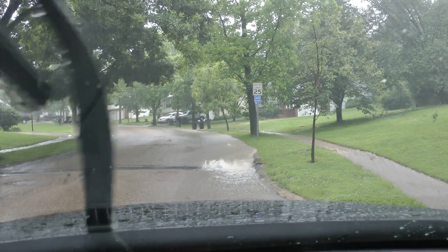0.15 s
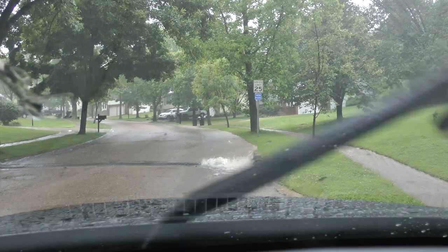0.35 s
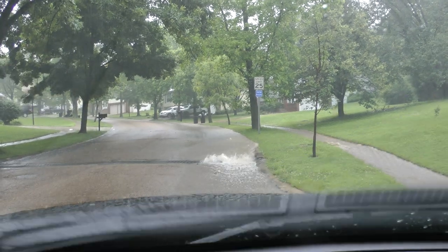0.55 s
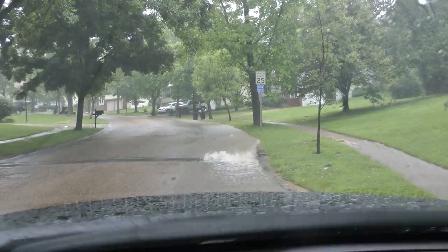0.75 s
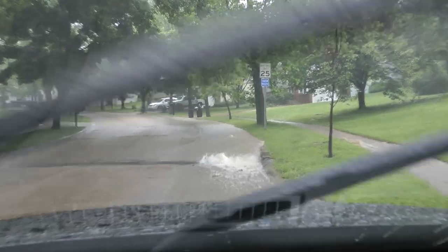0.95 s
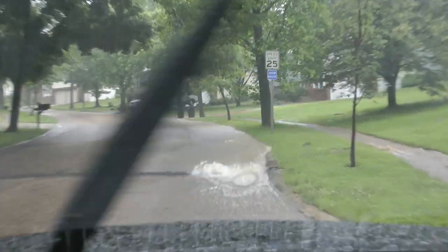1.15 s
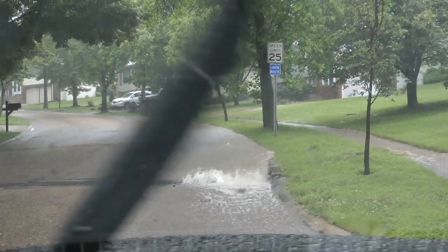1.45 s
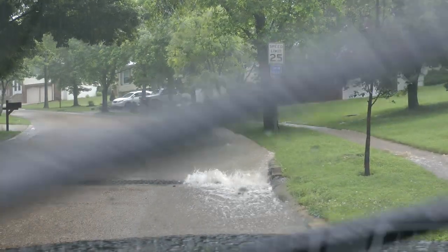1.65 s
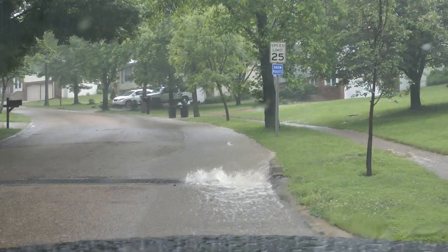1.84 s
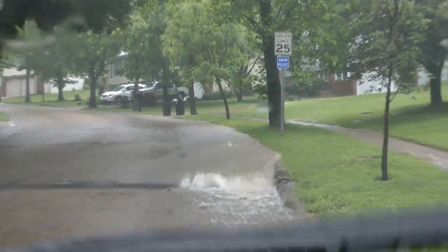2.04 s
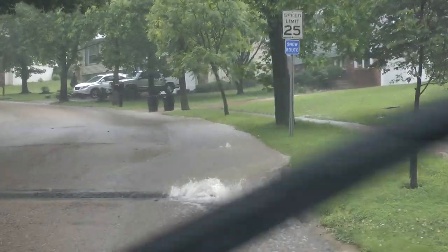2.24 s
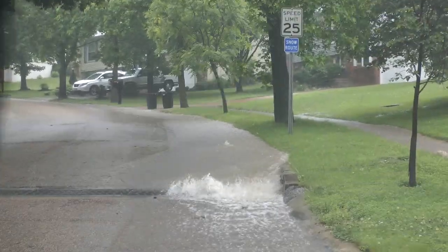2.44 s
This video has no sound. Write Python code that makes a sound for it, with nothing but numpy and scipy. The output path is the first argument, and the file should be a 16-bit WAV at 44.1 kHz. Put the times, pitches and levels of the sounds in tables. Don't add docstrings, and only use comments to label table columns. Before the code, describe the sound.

Rain drums densely on a parked car, heard inside through a small close stereo microphone. Sound opens abruptly at about 0.05 s. Patter and hiss continue to the end, with irregular glass ticks and heavy roof splats, strong near 0.85, 1.84, 2.05 and 2.3 s. Low wiper shudders swell around 0.24, 0.84, 1.44, 2.05 and 2.64 s. Brief lulls come near 1.06 and 1.8-2.1 s; the engine idles faintly.

```python
import sys
import numpy as np
from scipy import signal
from scipy.fft import rfft, irfft, next_fast_len
from scipy.io import wavfile

SR = 44100
rng = np.random.default_rng(int(sys.argv[2]) if len(sys.argv) > 2 else 0)


def digitize_waveform(pressure):
    field = np.atleast_2d(pressure).T
    bounded = np.clip(field, -1, 1)
    quanta = np.round(bounded * 32767).astype(np.int16)
    wavfile.write(sys.argv[1], SR, quanta)


def undo_db(level):
    steps = np.asarray(level, float) / 20
    return 10 ** steps


N = 114219

# start_s, level_db
TOP_TURNS = [
    (.235, -27),
    (1.444, -29.5),
    (2.64, -27.5),
]
# start_s, level_db
LOW_TURNS = [
    (.84, -32),
    (2.046, -32),
]


def read(points, hz):
    f, value = np.transpose(points)
    return np.interp(np.log(hz + 1), np.log(f + 1), value)


def evened(x):
    return x / np.sqrt(np.mean(x ** 2) + 1e-20)


def add(mix, start_s, sound):
    part = mix[..., max(round(start_s * SR), 0):][..., :sound.shape[-1]]
    part += sound[..., :part.shape[-1]]


def causal(db):
    log = np.log(undo_db(np.maximum(np.r_[db, db[-2:0:-1]], -100)))
    return np.fft.ifft(np.exp(log - 1j * signal.hilbert(log).imag)).real[:4096]


def coloured(x, points, below_db_per_oct, above_db_per_oct):
    # centre_hz, width_hz, gain_db
    cabin = [(497, 44, -8.5), (580.3, 27, 4), (633, 35, -6), (737, 290, -2.5), (916, 150, -10.5),
             (1044, 17, 3), (1149, 31, -13), (1282, 115, -6), (1450, 160, 2.5), (1551, 60, -16),
             (185, 125, 4), (3110, 280, -0.5)]
    hz = np.fft.rfftfreq(8192, 1 / SR)
    octs = np.log2(hz + 1)
    db = read(points[1:-1], hz)
    db = db - below_db_per_oct * np.maximum(np.log2(points[1][0]) - octs, 0)
    db = db - above_db_per_oct * np.maximum(octs - np.log2(points[-2][0]), 0)
    db = db + sum(gain_db / (1 + (2 * (hz - f) / width_hz) ** 2) for f, width_hz, gain_db in cabin)
    taps = causal(db)
    return signal.oaconvolve(x, taps[None] / np.linalg.norm(taps), axes=1)[:, :N]


def rain_gain(share):
    # centre_s, level_db
    lulls = [
        (.335, -0.5),
        (1.064, -6),
        (1.21, -1),
        (1.34, -0.5),
        (1.688, -0.5),
        (1.811, -7.5),
        (1.965, -6),
        (2.11, -4.5),
        (2.415, -0.5),
    ]
    lull_s = 0.016
    t = np.arange(N) / SR
    dip_db = sum(db * np.exp(-((t - s) / lull_s) ** 2) for s, db in lulls)
    return undo_db(share * dip_db)


def splat(noise, t60_s, tick_db, rise_s):
    t = np.arange(noise.shape[-1]) / SR
    ring = noise * undo_db(-60 * t / t60_s) * (1 - np.exp(-t / rise_s))
    return ring + undo_db(tick_db) * (t == 0) * [[1], [0]]


def patter(per_s, spread_db, tick_db, short_s, long_s, tint_db):
    size = undo_db(spread_db * np.minimum(rng.exponential(1, N), 4)) * (rng.random(N) < per_s / SR)
    kind = rng.integers(0, 16, N)
    t60s = np.geomspace(short_s, long_s, num=16)
    bands_hz = rng.permutation(np.geomspace(2000., 13000., num=16))
    out = np.zeros((2, N))
    for k, (t60_s, band_hz) in enumerate(zip(t60s, bands_hz)):
        grain = splat(rng.standard_normal((2, 3000)), t60_s, tick_db, 0.00024)
        grain = grain + undo_db(tint_db) * signal.lfilter(*signal.iirpeak(band_hz, 1.5, SR), grain)
        grain = grain / np.linalg.norm(grain[0])
        out += signal.oaconvolve((size * (kind == k))[None], grain, axes=1)[:, :N]
    return evened(out)


def engine():
    idle_hz = 32.3
    return undo_db(-56.5) * np.sin(2 * np.pi * idle_hz * np.arange(N) / SR) * [[1], [.3]]


def big_drops():
    # start_s, level_db, ring_hz, t60_s, drumming_db
    heavy_drops = [(0.0673, -25.5, 2600, 0.054, -11.5), (0.116, -28.5, 2940, 0.12, -11),
                   (0.158, -21.5, 2600, 0.1, -24), (0.2007, -27.5, 2940, 0.34, -28),
                   (0.2433, -21.5, 2560, 0.075, -2.5), (0.2949, -19.5, 2800, 0.095, -10.5),
                   (0.3516, -21.5, 1900, 0.065, -4), (0.4139, -20, 3270, 0.042, -9.5),
                   (0.5856, -30.5, 1930, 0.2, -3), (0.645, -23, 4000, 0.053, -36),
                   (0.7011, -30, 4000, 0.28, 1), (0.7735, -18, 3240, 0.064, -8),
                   (0.806, -20, 2230, 0.03, -10), (0.8478, -12.5, 3110, 0.047, -9.5),
                   (1.0862, -27, 3120, 0.066, -11), (1.1351, -27.5, 2240, 0.12, -14),
                   (1.2368, -22.5, 2100, 0.1, -5.5), (0.273, -17.5, 3006, 0.035, -9.5),
                   (0.4625, -28, 2820, 0.02, -2), (0.915, -37, 2600, 0.08, -16),
                   (1.02, -27.5, 3330, 0.04, -4.5), (1.098, -28.5, 2980, 0.22, -8),
                   (1.185, -24.5, 2340, 0.08, -8),
                   (1.2888, -27, 3740, 0.14, -18), (1.526, -19, 3110, 0.044, -9),
                  (1.5814, -21, 2150, 0.094, -3.5), (1.6439, -20, 3920, 0.025, -14),
                  (1.714, -19, 2780, 0.22, -8.5), (1.8496, -21.5, 3380, 0.13, -5.5),
                  (1.8813, -26.5, 3110, 0.33, -1.5), (1.9096, -24.5, 3070, 0.092, -2.5),
                  (2.001, -29, 2580, 0.15, 3.5), (2.0702, -18, 2630, 0.055, -7.5),
                  (2.1294, -17.5, 2300, 0.094, -4), (2.2789, -20.5, 3600, 0.061, -4),
                  (2.3428, -20, 2120, 0.06, -7.5), (2.371, -23.5, 2150, 0.036, -4),
                  (2.4866, -18.5, 2420, 0.032, -9.5), (2.5221, -23, 2540, 0.059, -4.5),
                  (2.5705, -19.5, 2880, 0.023, -6.5), (1.2635, -21.5, 3600, 0.034, -21),
                  (1.3124, -24.5, 3600, 0.037, -21), (1.5562, -19.5, 3500, 0.036, -9),
                  (1.407, -31, 4170, 0.12, -9), (2.435, -26.5, 2500, 0.04, -2)]
    spatter_db = 2.5
    ring_db, ring_q, ring_loss_db_per_s = 6, 11, 45
    high, low = np.zeros((2, 2, N))
    for s, db, hz, t60_s, drumming_db in heavy_drops:
        noise = rng.standard_normal((2, 2, 8000))
        t60_s = np.clip(t60_s, .01, .4)
        droplets = undo_db(spatter_db * np.repeat(noise[1, 0, ::40], 40))
        x = splat(noise[0] * droplets, t60_s, 0, 0.00059)
        ring = signal.lfilter(*signal.iirpeak(hz, ring_q, SR), x)
        x = x + undo_db(ring_db - ring_loss_db_per_s * t60_s) * ring
        add(high, s, undo_db(db - 13.0) * x)
        drumming = splat(noise[1], t60_s + 0.084, 0, 0.0014)
        add(low, s + 0.00295, undo_db(db - 6.0 + drumming_db) * drumming)
    return high, low


def ticks():
    # start_s, peak_db, pitch_hz
    close_drops = [(0.069, -24, 4360.0), (0.0801, -32, 4400.0), (0.0961, -30, 3390.0),
                   (0.3819, -27, 4180.0), (0.4167, -24, 2850.0), (0.4533, -27, 2750.0),
                   (0.4681, -16, 3520.0), (0.5076, -29, 4170.0), (0.5303, -28, 4160.0),
                   (0.5403, -28, 4530.0), (0.6966, -30, 3900.0), (0.7279, -24, 4260.0),
                   (0.7477, -22, 4300.0), (0.8084, -30, 3760.0), (0.8573, -21, 4650.0),
                   (0.9426, -31, 4560.0), (0.97, -33, 4380.0), (1.002, -26, 2940.0), (1.0165, -32, 3890.0),
                   (1.0802, -33, 3630.0), (1.1353, -26, 3030.0), (1.1445, -30, 5680.0),
                   (1.242, -26, 4220.0), (1.272, -26, 4710.0), (1.2907, -25, 3630.0), (1.3602, -25, 3550.0),
                   (1.3909, -30, 3440.0), (1.4094, -28, 4010.0), (1.507, -27, 3750.0),
                   (1.5194, -32, 4630.0), (1.5576, -19, 3540.0), (1.6237, -22, 4060.0),
                   (1.696, -31, 4100.0), (1.7317, -22, 4210.0), (1.8385, -13, 3960.0),
                   (1.8485, -18, 3720.0), (1.8983, -24, 4190.0), (1.9313, -26, 3480.0),
                   (1.9565, -32, 3810.0), (1.9811, -26, 3410.0), (2.0024, -25, 4440.0),
                   (2.0326, -28, 3770.0), (2.0457, -15, 3750.0), (2.1124, -28, 4070.0),
                   (2.1536, -32, 3020.0), (2.1622, -24, 3950.0), (2.1716, -32, 3960.0),
                   (2.1991, -31, 3960.0), (2.2219, -27, 3490.0), (2.2405, -27, 3990.0),
                   (2.2817, -26, 3530.0), (2.2909, -27, 4070.0), (2.3095, -16, 4070.0),
                   (2.3226, -24, 2890.0), (2.3722, -20, 4370.0), (2.3919, -26, 3490.0),
                   (2.4421, -29, 4890.0), (2.5334, -30, 4140.0), (2.5568, -24, 5030.0),
                   (2.5714, -26, 2790.0)]
    usual_hz, late_hz, lead_hz = 3900., 2700., 5200.
    rise_s, tail_db, tail_t60_s = .00016, -16, .025
    edge_db, dull_db_per_oct = -11, 24
    t = np.arange(3000) / SR
    click, ring = np.zeros((2, N)), np.zeros((2, N))
    for s, db, hz in close_drops:
        v = t * hz / usual_hz / rise_s
        cycles = rise_s * (late_hz * v + lead_hz * (1 - np.exp(-v)))
        wave = -np.sin(2 * np.pi * cycles) * v * np.exp(1 - v)
        wave = wave - undo_db(edge_db + dull_db_per_oct * np.log2(hz / usual_hz)) * (t == 0)
        add(click, s - rise_s, undo_db(db + 0.16) * wave * [[1], [.4]])
        tail = splat(rng.standard_normal((2, 3000)), tail_t60_s, 10., .0003)
        add(ring, s - rise_s, undo_db(db + tail_db) * tail)
    return click, ring


def swell():
    swell_s, swell_db, early_s = 0.082, -10, 0.011
    t = np.arange(N) / SR
    load = sum(undo_db(db + swell_db) * np.exp(-((t - s + early_s) / swell_s) ** 2)
               for s, db in TOP_TURNS + LOW_TURNS)
    band = signal.butter(2, [70., 380.], "bandpass", fs=SR, output="sos")
    rumble = evened(signal.sosfilt(band, rng.standard_normal((2, N))))
    return load * rumble * [[1], [.4]]


def wipers():
    # from_turn_s, pitch_hz, level_db, length_s
    top_shudder = [(-.075, 223, -11, 0.074), (-.06, 121, -11, .07), (-.02, 322, -5, 0.068),
                   (-.015, 106, -13, 0.056), (.003, 225, -4.5, .05), (.01, 59, -17, 0.08),
                   (.05, 185, -9, 0.078), (.085, 181.5, -9.5, .05)]
    # from_turn_s, pitch_hz, level_db, length_s
    low_shudder = [(-.085, 212.5, -4, 0.0392), (-.07, 129, -3, 0.045), (-.03, 125, -1, 0.0425),
                   (-.02, 291, -2, .05), (-.01, 230.5, -2.5, .05), (0, 123, 5, .055),
                   (0.033, 153.6, -1.5, 0.0512), (.01, 376, -9.5, 0.062)]
    path_db = np.array([[0], [-4.]])
    out = np.zeros((2, N))
    for turns, modes in ((TOP_TURNS, top_shudder), (LOW_TURNS, low_shudder)):
        for s, db in turns:
            for (from_turn_s, hz, mode_db, length_s), u in zip(modes, rng.random((len(modes), 3))):
                t = np.arange(0, length_s, 1 / SR)
                phase = u[1] + np.array([[0], [u[2]]])
                wave = np.sin(2 * np.pi * (hz * (1 + .04 * (u[0] - .5)) * t + phase))
                wave = wave * np.sin(np.pi * t / length_s) ** 2
                add(out, s + from_turn_s - length_s / 2, undo_db(db + mode_db + path_db) * wave)
    return out


def speck():
    # start_s, level_db, pitch_hz, length_s
    ping = (1.231, -39, 12800, .002)
    s, db, hz, length_s = ping
    out = np.zeros((2, N))
    t = np.arange(0, length_s, 1 / SR)
    add(out, s, undo_db(db) * np.sin(2 * np.pi * hz * t) * np.sin(np.pi * t / length_s) ** 2 * [[1], [0]])
    return out


def ports(x):
    # freq_hz, correlation
    same = [(60, 1), (900, 0.82), (3000, 0.9), (8000, 0.94), (15000, 0.98)]
    # freq_hz, level_db
    lean = [(80, 6.5), (550, 1.5), (1800, -1.6), (15000, 0)]
    # freq_hz, lead_rad
    lead = [(0, 0.65), (1120, -0.78), (1640, -0.66), (16300, -0.019)]
    size = next_fast_len(N + 2000)
    hz = np.fft.rfftfreq(size, 1 / SR)
    a, b = rfft(x, size)
    apart = np.arccos(np.clip(read(same, hz), 0, 1)) / 2
    shared, separate = a * np.cos(apart), b * np.sin(apart)
    turn = undo_db(read(lean, hz) / 2) * np.exp(.5j * read(lead, hz))
    return irfft(np.array([(shared + separate) * turn, (shared - separate) / turn]), size)[:, :N]


def scene():
    # freq_hz, density_db
    drop_colour = [(940, -36), (1600, -0.5), (1870, 2.5), (2560, 0), (3190, 1.5), (5830, -6.5),
                   (11400, -23), (14900, -23.5), (15800, -33)]
    # freq_hz, density_db
    shell_drum = [(20, -25), (45, -8), (92, -7), (193, -3.5), (430, -4), (647, -5.5), (764, 1), (904, -10),
                  (1700, -19), (2200, -40)]
    small = undo_db(-48) * rain_gain(1) * patter(1300, 4, 12., .015, .07, 10.)
    fine = undo_db(-56) * rain_gain(1) * patter(400, 2.2, 18., .004, .012, 14.)
    hiss = undo_db(-56) * rain_gain(0.17) * rng.standard_normal((2, N))
    dull = undo_db(-45.0) * rain_gain(0.4) * patter(600, 3.06, 0.9, 0.014, 0.096, -38)
    high, low = big_drops()
    low = signal.sosfilt(signal.butter(2, 300., "highpass", fs=SR, output="sos"), low)
    click, ring = ticks()
    glass = coloured(high + ring + small + fine + hiss, drop_colour, 19.7, 0)
    shell = coloured(low + undo_db(2.5) * small + dull, shell_drum, 31.0, 30.7)
    return ports(glass + click + speck() + shell + wipers() + swell() + engine())


def top_cut(x):
    return signal.sosfilt(signal.butter(12, 16730, fs=SR, output="sos"), x)


def record(dry):
    start_s, fade_s, edge_hz = 0.0446, 0.0066, 15900
    opened = np.clip((np.arange(N) / SR - start_s) / fade_s, 0, 1)
    lowpass = signal.firwin(511, edge_hz, window=("kaiser", 7), fs=SR)
    limited = signal.oaconvolve(dry * opened, lowpass[None], "same")
    return top_cut(limited)


dry = scene()
out = record(dry)
digitize_waveform(out)
```